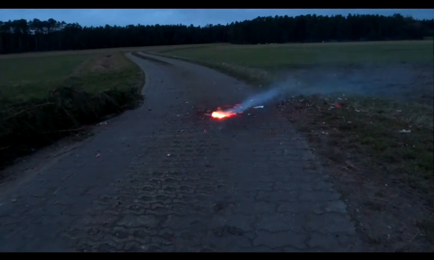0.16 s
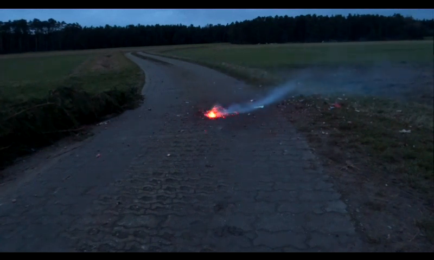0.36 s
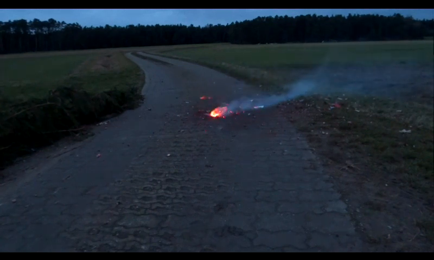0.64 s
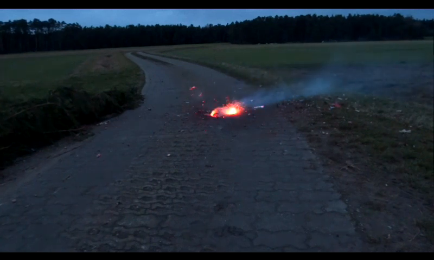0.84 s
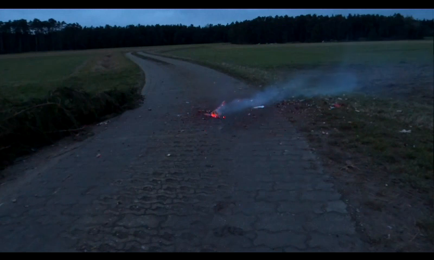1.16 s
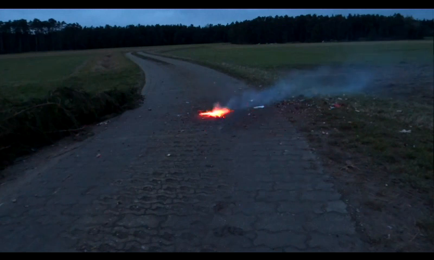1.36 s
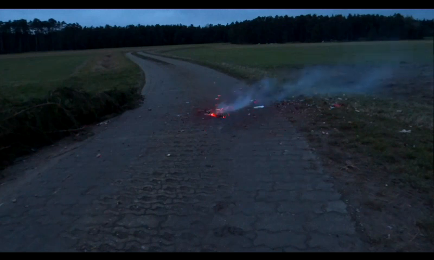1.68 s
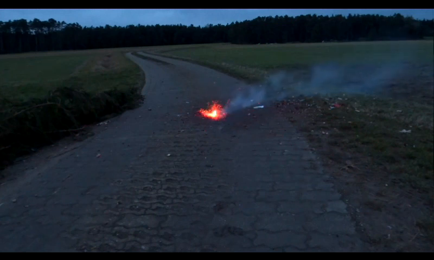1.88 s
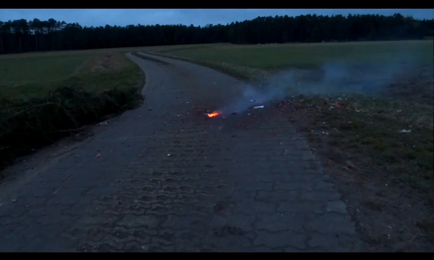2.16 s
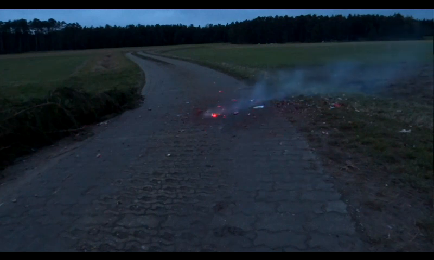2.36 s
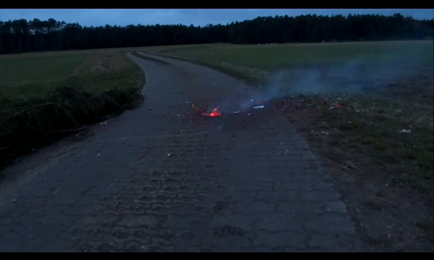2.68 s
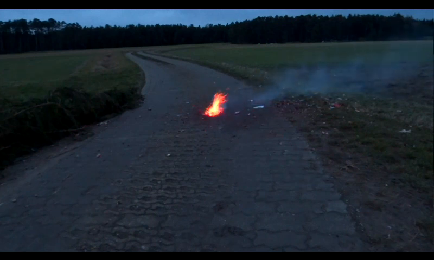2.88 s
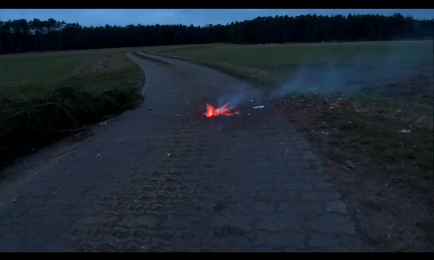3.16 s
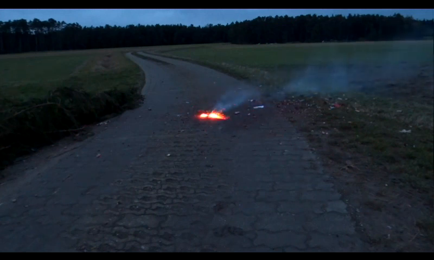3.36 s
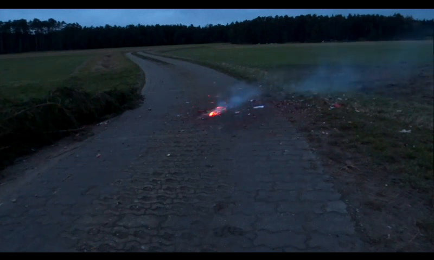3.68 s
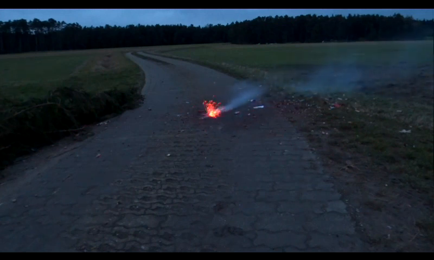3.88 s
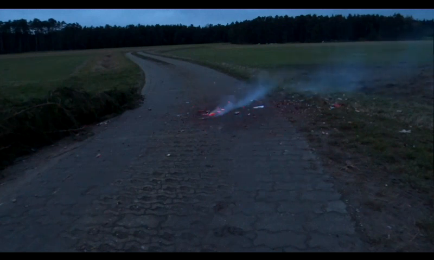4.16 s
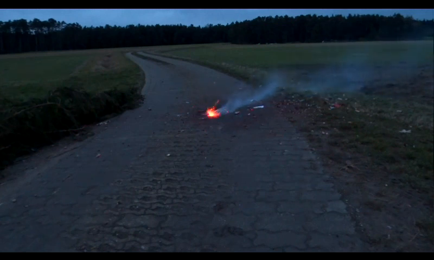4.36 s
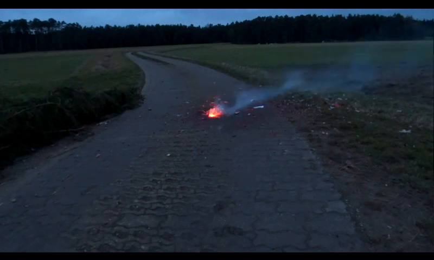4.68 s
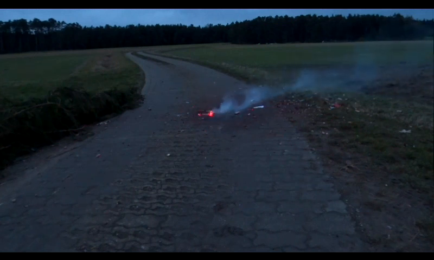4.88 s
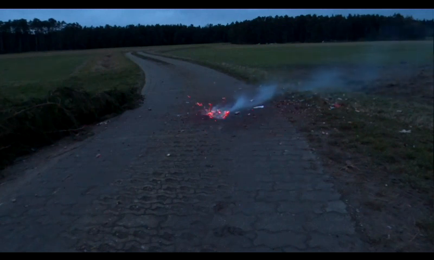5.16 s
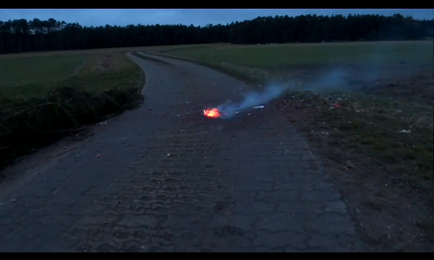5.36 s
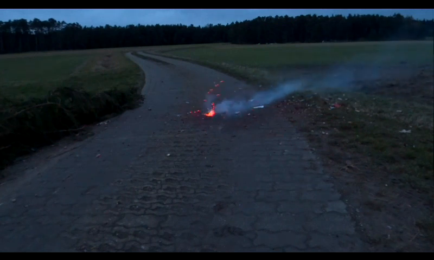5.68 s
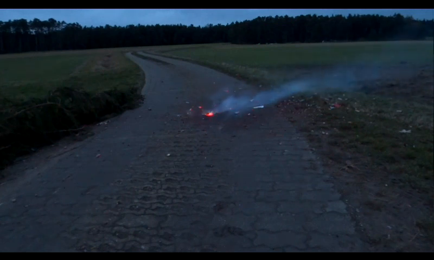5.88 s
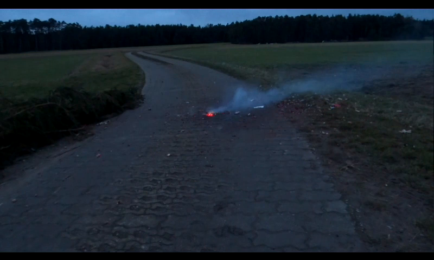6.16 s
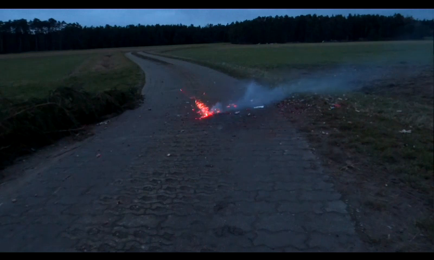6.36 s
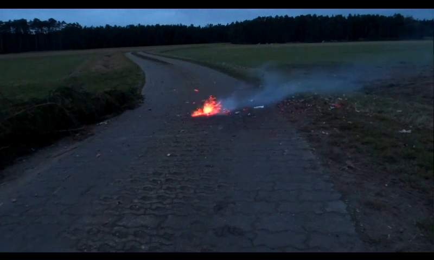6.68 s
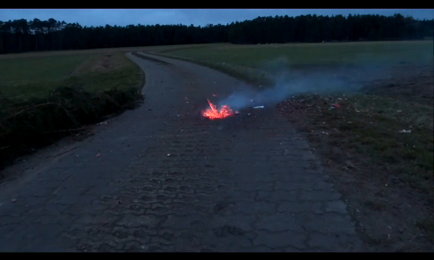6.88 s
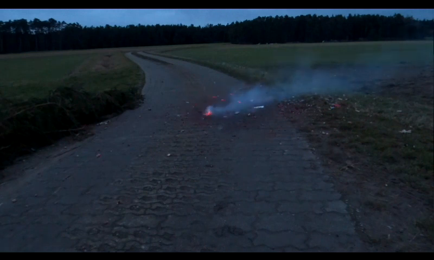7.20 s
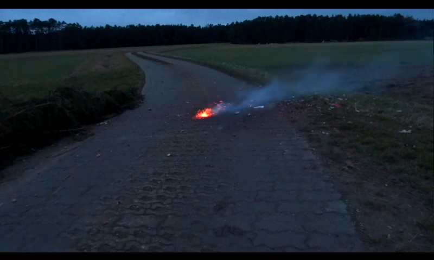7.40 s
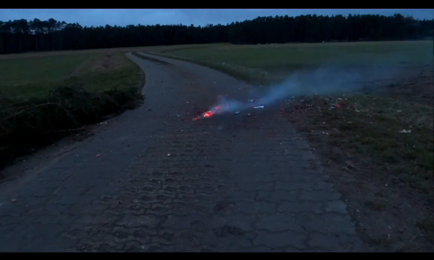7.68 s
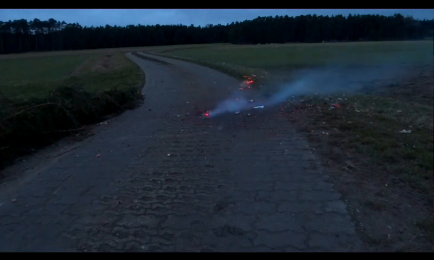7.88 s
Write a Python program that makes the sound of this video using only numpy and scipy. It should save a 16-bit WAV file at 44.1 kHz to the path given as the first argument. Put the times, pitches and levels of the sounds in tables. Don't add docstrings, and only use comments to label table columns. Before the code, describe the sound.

Outdoors in a breeze, a fuse hisses and sputters while firecrackers burst irregularly, roughly five or six per second. Short rushes of gas precede some bangs. The cracks vary from thin and snappy to deep and solid, followed by fizzing sparks and dull returns from banks, hedges and a wood's edge. Wind thuds and flutters against a small stereo recorder some ten metres away; the firing continues to the end.

```python
import sys
import numpy as np
from scipy import signal
from scipy.fft import rfft, irfft, next_fast_len
from scipy.io import wavfile
from scipy.ndimage import uniform_filter1d, minimum_filter1d

SR = 44100
rng = np.random.default_rng(int(sys.argv[2]) if len(sys.argv) > 2 else 0)


def magnitude_from_level(level_db):
    exponent = np.asarray(level_db, float) / 20
    return 10 ** exponent


def materialize(psi):
    bounded = np.clip(np.atleast_2d(psi).T, -1, 1)
    quanta = np.round(bounded * 32767).astype(np.int16)
    wavfile.write(sys.argv[1], SR, quanta)


N = 354123

# [t/s, hiss level/dB]
FUSE_BURN = [(0.0, -45), (0.4, -45.5), (0.7, -43), (1.05, -41), (1.4, -37), (1.55, -39.5), (2.1, -43),
             (2.66, -43), (3.2, -40.5), (3.62, -44), (3.85, -41), (4.3, -42.5), (5.4, -43), (5.85, -39.5),
             (6.2, -37), (6.45, -47.5), (7.2, -45.5), (8.03, -47.5)]
# [f/Hz, level/dB per Hz]
FUSE_COLOUR = [(290, -11), (500, -12), (721, -35), (885, -21), (2360, -12), (3210, -10.5), (3880, -15),
               (5270, -6), (8540, -0.5), (12900, -19.5), (15100, -40.5), (16500, -76.5)]
ROAR_DB, ROAR_SLOPE = -50.5, 0.21
FLARE_HISS_DB, FLARE_ROAR_DB, FLARE_T60_S = -11.5, -11.5, 0.5

# [t/s, rumble level/dB]
BREEZE_RUMBLE = [(0, -49), (0.1, -43), (0.6, -54), (0.72, -51), (1.05, -37.5), (1.27, -81), (1.42, -44.5),
                 (2.0, -58), (2.7, -49.5), (2.9, -51), (3.05, -37.5), (3.65, -44), (4.2, -44),
                 (4.95, -35.5), (5.25, -49), (5.95, -45), (7.2, -39.5), (8.03, -41)]
# [t/s, length/s, level/dB, flutter over rumble/dB]
WIND_PUFFS = [(0.072, 0.045, -29, -13.5), (.17, .07, -37, 5.5), (0.22, 0.11, -31, -1),
              (0.354, 0.036, -30.5, 2.5), (0.467, 0.07, -36.5, 3.5), (0.61, 0.072, -28, -6),
              (0.862, 0.033, -39, -6), (0.943, 0.05, -34.5, -15), (1.183, 0.035, -41, -31),
              (1.583, 0.027, -32, -30), (1.816, 0.044, -36, -23), (2.184, 0.14, -40.5, -18),
              (2.952, 0.032, -34, -12), (3.127, 0.13, -46, 8), (3.29, 0.11, -36.5, -7.5),
              (3.79, 0.035, -28, -6), (3.849, 0.028, -28.5, -3), (4.17, 0.16, -31.5, -10.5),
              (4.31, 0.075, -31, -8.5), (4.59, 0.025, -37, -12), (4.644, .04, -35, -7),
              (4.733, .06, -36.5, -1.5), (6.132, 0.2, -33, -5.5), (6.636, 0.046, -32.5, -9.5),
              (6.74, .05, -33, -23), (6.86, 0.26, -38.5, -1.5), (7.24, 0.049, -38.5, -26),
              (7.51, 0.13, -33, -3), (7.73, 0.14, -33, 1.5), (7.908, 0.14, -30, -3.5)]
# [f/Hz, level/dB per Hz]
WIND_COLOUR = [(12, -39), (20, -4), (117, -1), (240, -4), (419, -12.5), (476, -14.5), (624, -20.5),
               (858, -24), (900, -27), (1170, -21), (1980, -120)]
# [f/Hz, side share]
WIND_SIDE_SHARE = [(25, 0.23), (60, 0.34), (125, 0.43), (300, 0.75), (800, 1)]
FLUTTER_DB, FLUTTER_SLOPE = -54, 1

# [start t/s, end t/s, level at the
# end/dB]
GAS_JETS = [(0.1, 0.113, -26), (0.365, 0.369, -24), (0.715, 0.72, -31), (0.858, 0.869, -32),
            (1.343, 1.368, -23.5), (1.444, 1.4445, -32.5), (1.554, 1.57, -39), (2.182, 2.194, -29),
            (2.556, 2.56, -24), (2.7265, 2.744, -30), (2.861, 2.8745, -31.5), (3.863, 3.879, -30),
            (4.345, 4.359, -28), (4.406, 4.414, -25.5), (4.66, 4.671, -34), (5.086, 5.0905, -21),
            (6.293, 6.305, -27), (6.404, 6.415, -32), (6.666, 6.678, -26), (6.854, 6.868, -24),
            (7.066, 7.094, -27), (7.336, 7.337, -28), (7.81, 7.81, -37), (5.3663, 5.369, -23.5),
            (0.542, 0.543, -37.5), (1.773, 1.774, -22), (3.339, 3.34, -43), (7.54, 7.548, -32)]
# [f/Hz, level/dB per Hz]
JET_COLOUR = [(410, -29), (700, -5.5), (2390, -8), (3850, -8), (4640, -5), (8080, -0.5), (13900, -17),
              (15700, -28), (16500, -51)]

# [t/s, crack level/dB, snap level/dB, spray level/dB, spray t60/s]
PLAIN_TUBES = [(0.1152, -10, -22, -38, 0.24), (0.7223, -0.5, -6.5, -21.5, 0.14),
               (0.8566, -8.5, -14.5, -19.5, 0.19), (1.5686, -10, -12.5, -22.5, 0.21),
               (1.5815, -6.5, -6, -28.5, 0.19), (2.1983, -12.5, -16, -27, 0.062),
               (2.2277, -9, -11, -23.5, 0.13), (2.735, -15, -14, -44, 0.12), (2.8752, -12, -16, -37, 0.05),
               (3.1349, -8, -11, -31, 0.088), (3.3535, -18.5, -14, -39.5, 0.14),
               (3.8754, -5.5, -10, -30, 0.18), (4.4181, -10, -17.5, -27, 0.065),
               (4.5848, -9, -11, -24, 0.22), (5.3692, -7, -14, -23, 0.23), (5.505, -4, -5, -23, 0.12),
               (5.5143, -3.5, -4.5, -21, 0.23), (6.4115, -7, -11, -25, 0.26), (6.4427, -11, -12, -27, 0.16),
               (6.8625, -11, -18, -27, 0.22), (7.082, -9.5, -13, -26.5, 0.21),
               (7.3467, -9.5, -13, -26.5, 0.068), (7.5495, -8, -12, -24, 0.18),
               (7.6026, -8, -15, -28, 0.077)]
SHARP_TUBES = [(0.2607, -9, -11.5, -26.5, 0.23), (0.3719, -9.5, -8.5, -25.5, 0.18),
               (0.5411, -12.5, -9.5, -25.5, 0.12), (1.276, -6, -8, -29, 0.21),
               (3.5723, -6, -10.5, -23.5, 0.18), (4.363, -6, -7, -25, 0.14),
               (4.6738, -6.5, -16, -29.5, 0.15), (4.9938, -5.5, -6.5, -28.5, 0.22),
               (5.0074, -10, -6, -26, 0.18), (6.2218, -10.5, -9, -26.5, 0.2),
               (6.3043, -8, -7.5, -31, 0.078), (7.3966, -15.5, -13.5, -36.5, 0.099),
               (7.8034, -13.5, -14, -23.5, 0.17)]
DEEP_TUBES = [
    (1.3722, -13.5, -15, -54.5, 0.16),
    (1.7788, -3.5, -4.5, -23, 0.12),
    (1.9007, -8, -10, -22.5, 0.17),
    (2.5635, -7, -13.5, -25.5, 0.17),
    (5.094, -9, -17.5, -26, 0.13),
    (5.7894, -6, -8.5, -26, 0.19),
    (6.6759, -4.5, -9, -21, 0.22),
    (6.7455, -6.5, -12, -25.5, 0.18),
]
SHARP_THUMP_DB, PLAIN_THUMP_DB, DEEP_THUMP_DB = -40.5, -18.5, -10.5

# [delay t/s, level/dB,
# centre f/Hz, width f/Hz, left minus right/dB]
ECHOES = [(.00225, -4, 2000, 9000, 0), (.0034, -5, 7000, 6000, 0), (.004, -8, 3000, 6000, 0),
          (.0076, 0, 3000, 5000, -3.5), (.0085, -6, 2500, 7000, -3), (.0098, -10, 4000, 6000, -2),
          (.0292, -4, 2000, 2000, -3),
          (.012, -3, 795, 1000, 9), (.0161, -6.5, 880, 880, 0), (.02, -3, 844, 895, -4),
              (.0305, -33, 820, 890, 6), (0.0329, 0, 554, 533, -1.5), (0.0457, -16, 6000, 6000, -6),
              (.0817, -14.5, 2980, 3000, -5), (.0835, -1.5, 720, 440, -1), (.1325, -17.5, 3300, 2448, -4.5),
              (0.1336, -4, 814, 695, 0), (.1385, -15, 704, 600, -1), (0.1754, -20, 1760, 2500, 1),
              (0.212, -22, 900, 700, -2)]
# [centre f/Hz, level/dB, t60/s]
FIELD_SCATTER = [(320, -31, 0.29), (533, -25.5, 0.09), (1000, -33.5, 0.57), (1940, -37.5, 0.16),
                 (4500, -71, 0.084)]
# [f/Hz, level/dB per Hz]
SPRAY_COLOUR = [(410, 9.5), (700, 1), (1110, -1), (1490, -8), (1960, -4), (3330, 1.5), (4520, -1.5),
                (7460, 1.5), (14100, -18.5), (15900, -48), (16500, -58)]


def unit(x):
    return x / np.sqrt(np.mean(x ** 2))


def coloured(points):
    hz, db = np.transpose(points)
    size = next_fast_len(N)
    log_hz = np.log(np.fft.rfftfreq(size, 1 / SR) + 1)
    gain = magnitude_from_level(np.interp(log_hz, np.log(hz), db))
    return unit(irfft(rfft(rng.standard_normal(size)) * gain, size)[:N])


def band(x, hz, width_hz):
    return signal.lfilter(*signal.iirpeak(min(hz, .4 * SR), hz / width_hz, SR), x)


def below(x, hz):
    return signal.sosfilt(signal.butter(2, hz, fs=SR, output="sos"), x)


def walk(rate):
    k = int(SR / rate)
    steps = np.repeat(rng.standard_normal(N // k + 1), k)
    return unit(uniform_filter1d(uniform_filter1d(steps, k), k)[:N])


def spread(mid, side, share):
    return np.array([mid + share * side, mid - share * side])


def patchy(points, side_share, patch_db, rate):
    mid, side = coloured(points), coloured(points)
    out = np.zeros((2, N))
    for hz in 900 * 2. ** np.arange(5):
        stereo = spread(mid, side, side_share * (hz / 4000) ** 0.063)
        out += magnitude_from_level(patch_db * walk(rate)) * band(stereo, hz, hz * 0.53)
    return out / np.std(out)


def add(out, x, s):
    i = int(s * SR)
    out[..., i:i + x.shape[-1]] += x[..., :N - i]


def curves(table):
    s, *columns = np.transpose(table)
    return [np.interp(np.arange(N) / SR, s, c) for c in columns]


def bangs():
    kinds = (SHARP_TUBES, SHARP_THUMP_DB), (PLAIN_TUBES, PLAIN_THUMP_DB), (DEEP_TUBES, DEEP_THUMP_DB)
    return sorted((*row, thump_db) for rows, thump_db in kinds for row in rows)


def burning():
    hiss_db, = curves(FUSE_BURN)
    roar_db = ROAR_DB + ROAR_SLOPE * (hiss_db + 42)
    flare, t = np.zeros(N), np.arange(SR // 2) / SR
    for s, _, _, spray_db, *_ in bangs():
        add(flare, magnitude_from_level(2 * (spray_db - 60 * t / FLARE_T60_S)), s)
    hiss_power = magnitude_from_level(2 * hiss_db) + magnitude_from_level(2 * FLARE_HISS_DB) * flare
    roar_power = magnitude_from_level(2 * roar_db) + magnitude_from_level(2 * FLARE_ROAR_DB) * flare
    return 10 * np.log10(hiss_power), 10 * np.log10(roar_power)


def fuse(hiss_db, roar_db):
    noise = patchy(FUSE_COLOUR, 0.13, patch_db=2.5, rate=3.943)
    roar = below(noise, 4300)
    return magnitude_from_level(hiss_db + 1.5) * unit(noise - roar) + magnitude_from_level(roar_db + 5.5) * unit(roar)


def gusts():
    t = np.arange(N) / SR
    breeze_db, = curves(BREEZE_RUMBLE)
    rumble = magnitude_from_level(2 * breeze_db)
    flutter = magnitude_from_level(2 * (FLUTTER_DB + FLUTTER_SLOPE * (breeze_db + 44)))
    for s, length, db, sharp_db in WIND_PUFFS:
        puff = magnitude_from_level(2 * db) * np.exp(-np.minimum((2 * (t - s) / length) ** 2, 50))
        rumble = rumble + puff
        flutter = flutter + magnitude_from_level(2 * sharp_db) * puff
    return 10 * np.log10(rumble), 10 * np.log10(flutter)


def wind(rumble_db, flutter_db):
    out, buffet = 0, 1.43 * np.tanh(walk(60) / 1.7)
    share_hz, share = np.transpose(WIND_SIDE_SHARE)
    air = np.array([coloured(WIND_COLOUR), coloured(WIND_COLOUR)])
    for hz in 25 * 2 ** np.arange(0, 5.1, .5):
        eddy = np.roll(air, shift=rng.integers(N), axis=1)
        eddy = band(band(eddy, hz, hz * .5), hz, hz * .5)
        slow = uniform_filter1d(eddy ** 2, size=SR // 8) / np.mean(eddy ** 2)
        eddy = eddy * (slow + 0.046) ** -.3
        high = np.clip(np.log2(hz / 160.0), 0, 1)
        db = (1 - high) * (rumble_db - 0.5) + high * (flutter_db + 6.0)
        db = db + 3.0 * buffet * (0.19 + 0.88 * high) + 3.2 * walk(30)
        side_share = np.interp(np.log(hz), np.log(share_hz), share)
        out = out + magnitude_from_level(db) * eddy * np.array([[1], [side_share]])
    mid, side = out
    mid = mid - 1.2 * (mid ** 2 - uniform_filter1d(mid ** 2, size=1500))
    return spread(mid, side, 1)


def jets():
    gain = np.zeros(N)
    for start, end, db in GAS_JETS:
        rise = np.linspace(0, 1, int((end - start) * SR))
        add(gain, magnitude_from_level(db - 12 * (0.7 - rise)) * np.minimum(1, rise / 0.26), start)
        add(gain, magnitude_from_level(db - 60 * np.arange(2000) / SR / 0.019), end)
    return gain * magnitude_from_level(2.2 * walk(710)) * spread(coloured(JET_COLOUR), coloured(JET_COLOUR), 0.21)


def blast(crack_db, thump_db, snap_db, chance):
    t = np.arange(512) / SR
    thump = np.cos(2 * np.pi * 640 * (1 + 0.09 * chance[2]) * (t - .0004))
    thump = thump * np.exp(-t / 0.00054) * (1 - np.exp(-(t / 0.000059) ** 2))
    crack = np.cos(2 * np.pi * 2200 * (1 + .12 * chance[0]) * (t - .0004))
    crack = crack * np.exp(-((t - .00044) / .00027) ** 2)
    torn_paper = chance * np.exp(-t / 0.00049) * (t > .0002)
    snap = band(band(torn_paper, 7400, 5200), 7400, 5200)
    body = magnitude_from_level(crack_db) * crack + magnitude_from_level(thump_db + 8.0) * thump
    return body, magnitude_from_level(snap_db + 4.0) * snap / abs(snap).max()


def add_echoes(out, pulse, s, lift_db):
    for lag, db, hz, width_hz, pan_db in ECHOES:
        u, v = rng.standard_normal(2)
        echo = band(pulse, hz * (1 + .07 * v), width_hz)
        if lag > .011:
            echo = band(echo, hz, width_hz)
        if lag > .04:
            first = np.roll(echo, shift=int(30 + 12 * v), axis=1)
            second = np.roll(echo, shift=int(95 + 25 * u), axis=1)
            echo = echo + .5 * first + 0.59 * second
        risen = 1 - np.exp(-(lag / .025) ** 2)
        scatter_db = 1.3 * u
        pan = np.array([[pan_db], [-pan_db]]) / 2
        add(out, echo * magnitude_from_level(db + risen * lift_db + scatter_db + pan), s + lag)


def spray_power(crack_db, snap_db, spray_db, t60):
    t = np.arange(SR // 3) / SR
    attack = (1 - np.exp(-t / 0.0049)) ** 2
    linger = np.minimum(1 + magnitude_from_level(-28 + 70 * t / 0.17), 1e3)
    bright_db = np.array([[-1], [1]]) * 0.27 * (snap_db - crack_db)
    return magnitude_from_level(2 * (spray_db + bright_db - 60 * (t - .018) / t60)) * attack * linger


def spray(power):
    sparks = magnitude_from_level(1.8 * walk(900)) * patchy(SPRAY_COLOUR, 0.22, patch_db=1.5, rate=150)
    dull = below(sparks, 4300)
    return np.sqrt(power[0]) * dull + np.sqrt(power[1]) * (sparks - dull)


def field(blasts):
    t = np.arange(SR // 2) / SR
    grain = rng.standard_normal((2, len(t))) * magnitude_from_level(4.5 * rng.standard_normal(len(t)))
    onset = 1 - np.exp(-(t / .012) ** 2)
    answer = sum(band(grain, hz, hz) * magnitude_from_level(db - 60 * t / t60) for hz, db, t60 in FIELD_SCATTER) * onset
    return np.array([signal.fftconvolve(blasts, a)[:N] for a in spread(*answer, 0.29)])


def crackers():
    out, far, power = np.zeros((2, N)), np.zeros(N), np.zeros((2, N))
    for s, crack_db, snap_db, spray_db, t60, thump_db in bangs():
        chance = rng.standard_normal(512)
        body, snap = blast(crack_db, thump_db, snap_db, chance)
        pulse = body + spread(snap, np.roll(snap, shift=3), 0.2 * np.sign(chance[1]))
        lift_db = .6 * (spray_db + 14 - max(crack_db, snap_db))
        add(out, pulse, s - .0004)
        add_echoes(out, pulse, s - .0004, lift_db)
        add(far, (body + snap) * magnitude_from_level(lift_db), s)
        add(power, spray_power(crack_db, snap_db, spray_db, t60), s)
    return out + spray(power) + field(far)


def scene():
    return fuse(*burning()) + wind(*gusts()) + jets() + crackers()


def narrow(x):
    mid, side = (x[0] + x[1]) / 2, (x[0] - x[1]) / 2
    treble = signal.sosfiltfilt(signal.butter(4, 3800, "high", fs=SR, output="sos"), side)
    power = uniform_filter1d(treble ** 2, size=1024) / magnitude_from_level(2 * -47.5)
    return spread(mid, side - treble / (1 + power ** 3), 0.9)


def top_cut(x):
    return signal.sosfilt(signal.butter(12, 16970, fs=SR, output="sos"), x)


def record(dry):
    gain = np.minimum(1, .66 / (abs(dry).max(axis=0) + 1e-9))
    gain = uniform_filter1d(minimum_filter1d(gain, size=89), size=89)
    top = signal.butter(8, 15200, fs=SR, output="sos")
    mix = signal.sosfilt(top, narrow(dry * gain))
    return top_cut(mix)


dry = scene()
out = record(dry)
materialize(out)
```